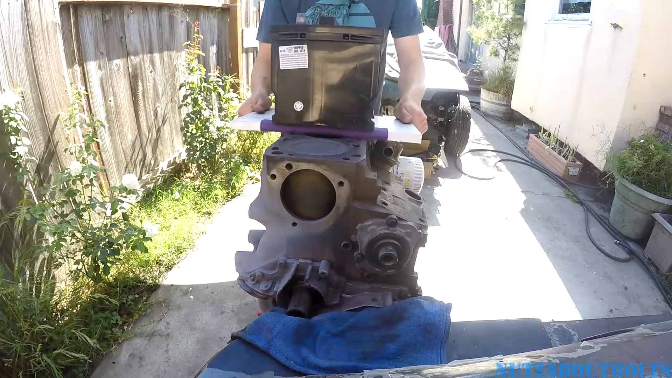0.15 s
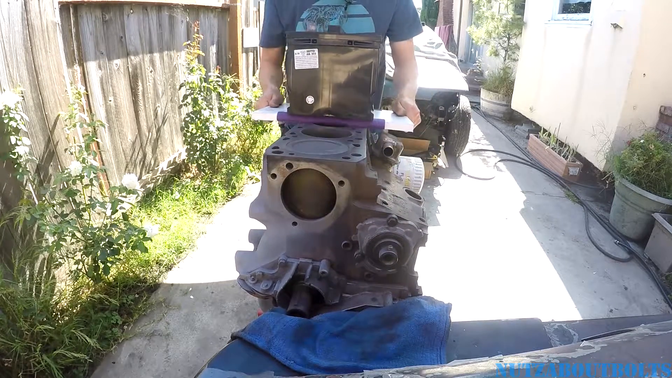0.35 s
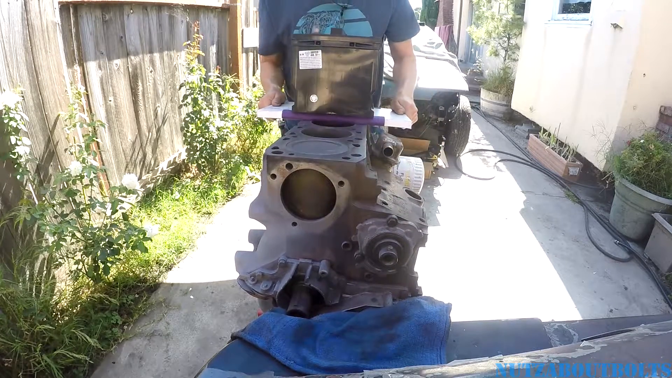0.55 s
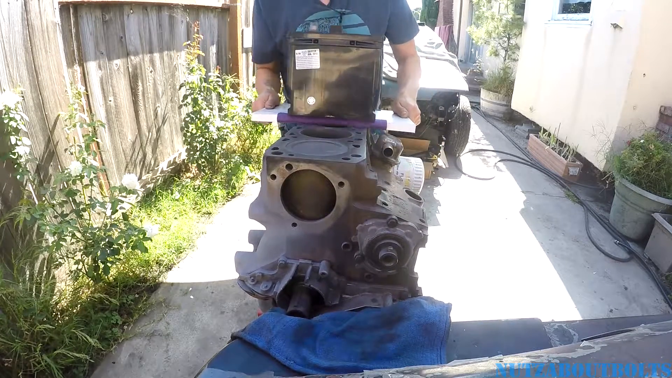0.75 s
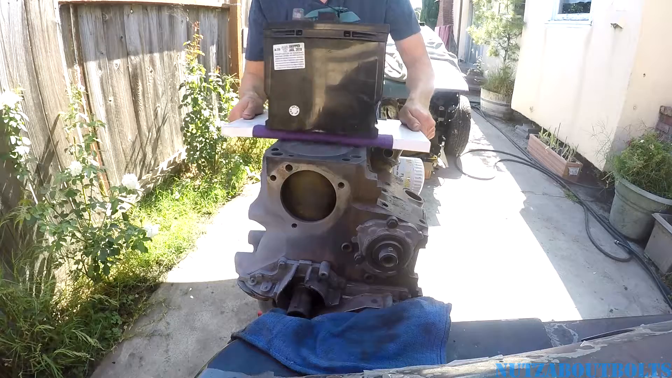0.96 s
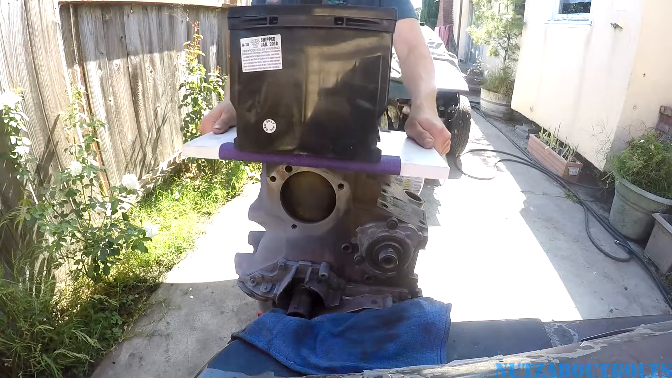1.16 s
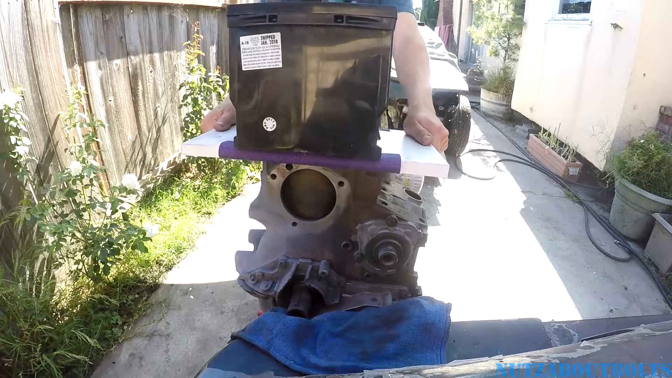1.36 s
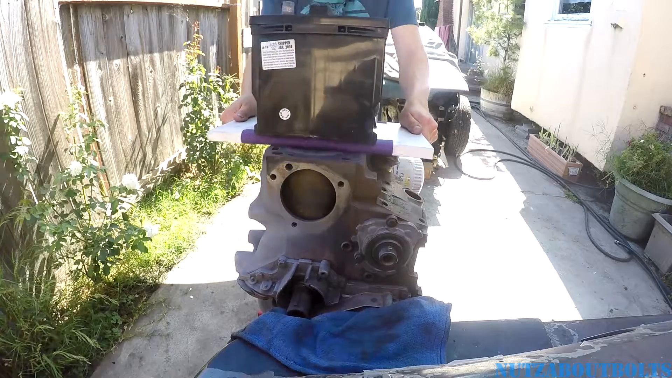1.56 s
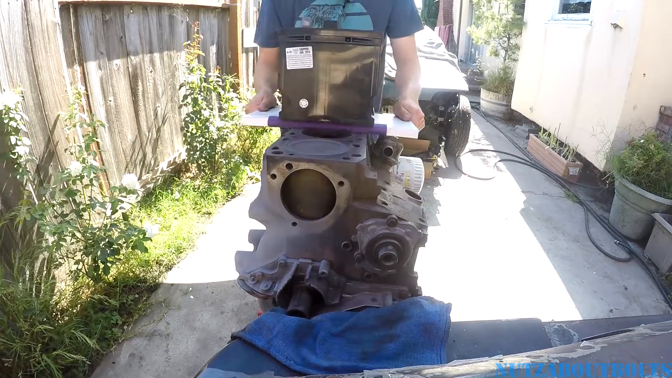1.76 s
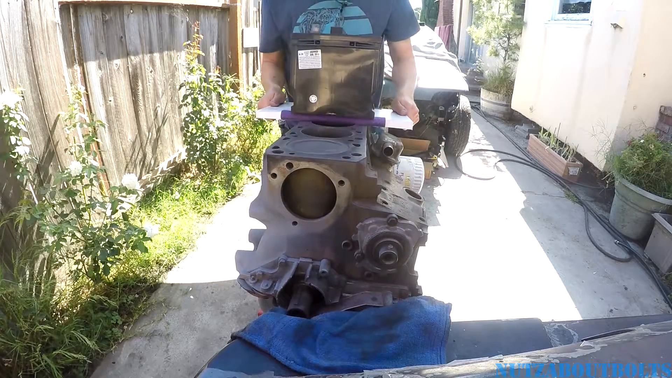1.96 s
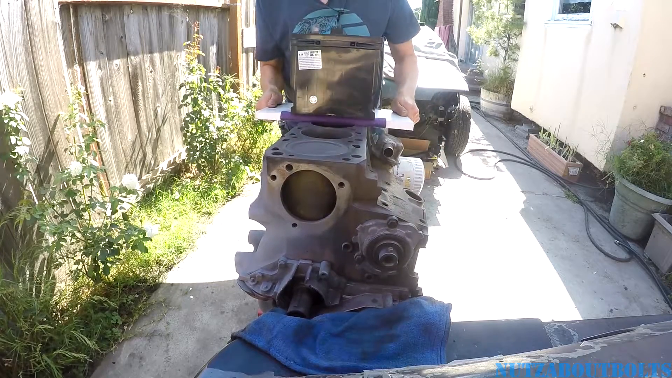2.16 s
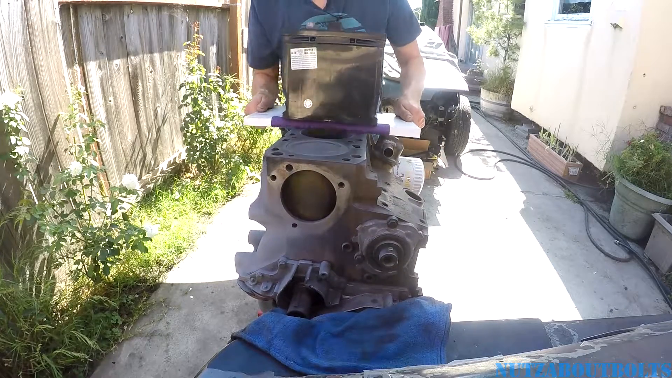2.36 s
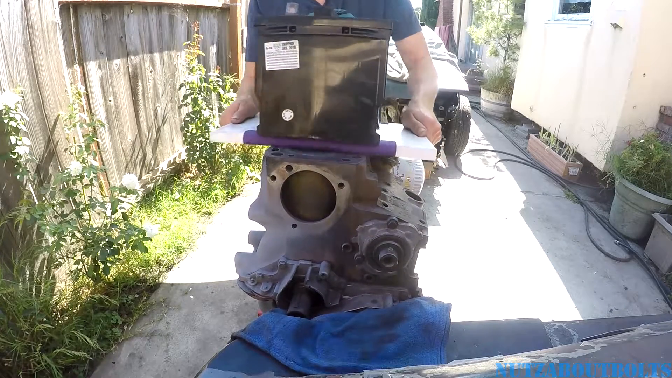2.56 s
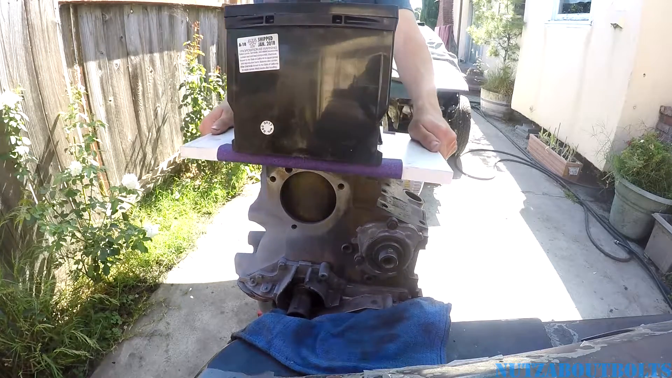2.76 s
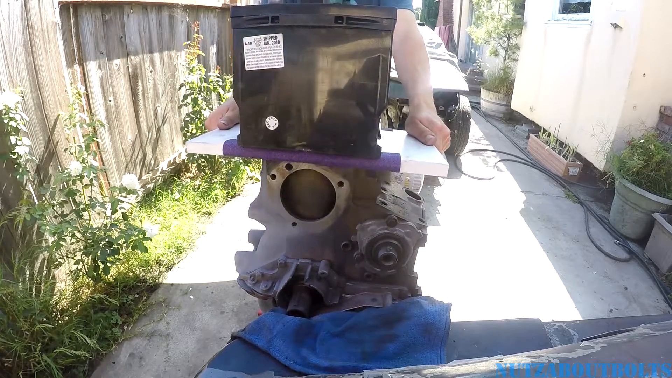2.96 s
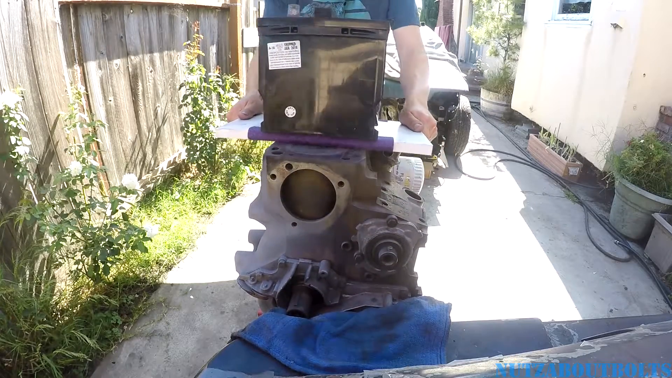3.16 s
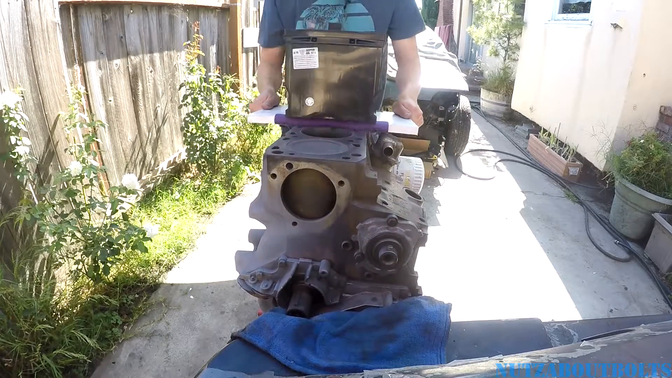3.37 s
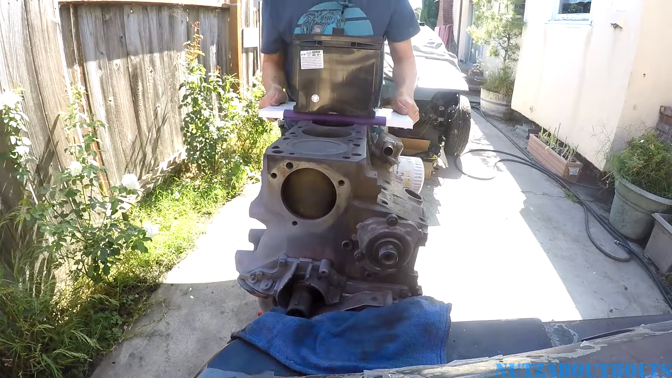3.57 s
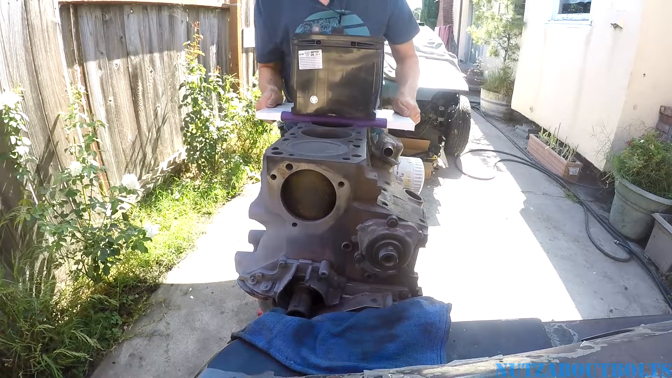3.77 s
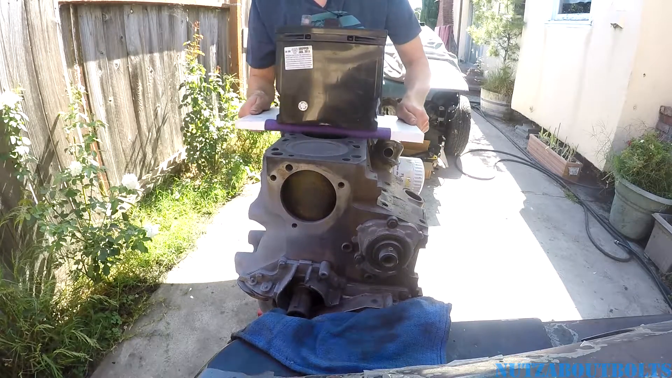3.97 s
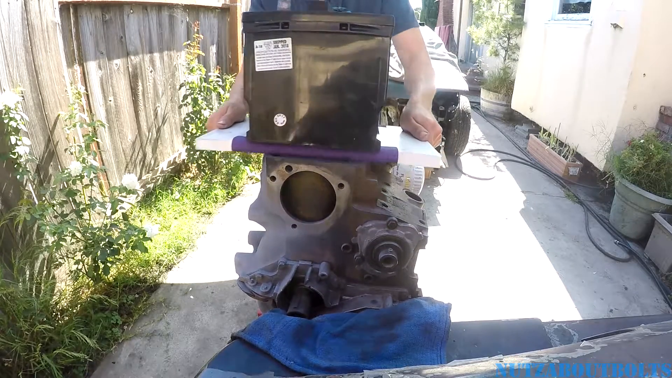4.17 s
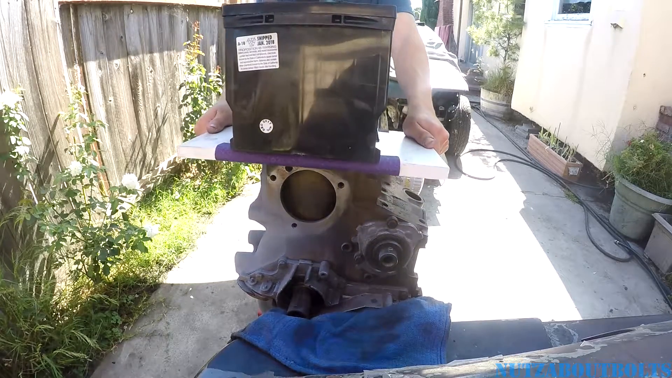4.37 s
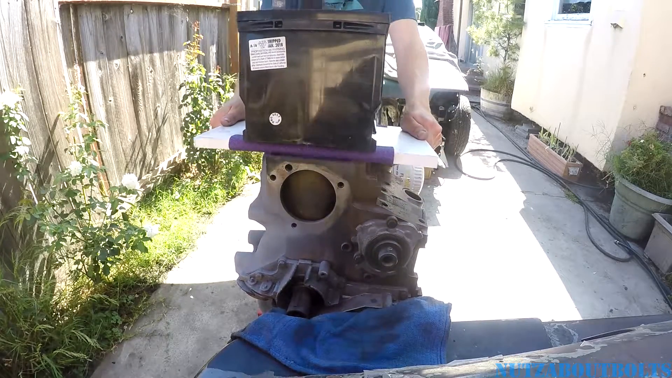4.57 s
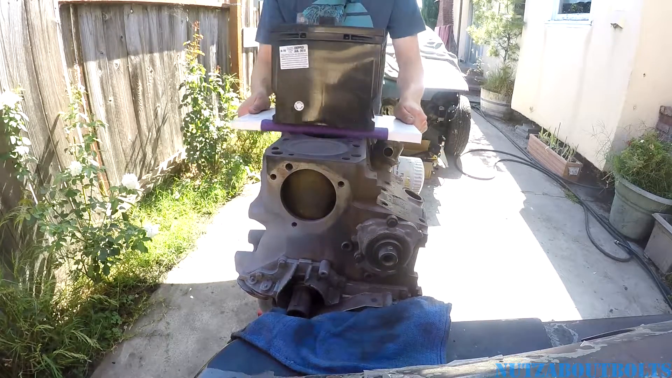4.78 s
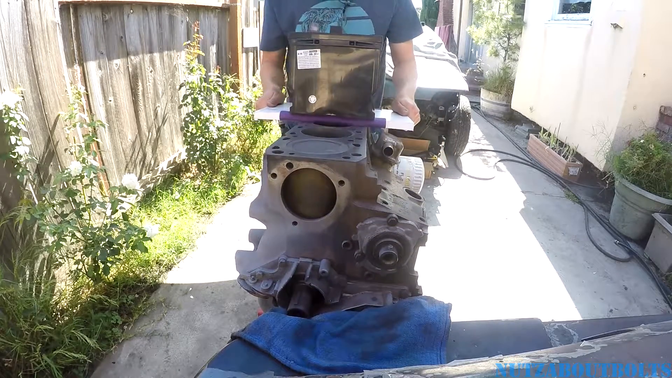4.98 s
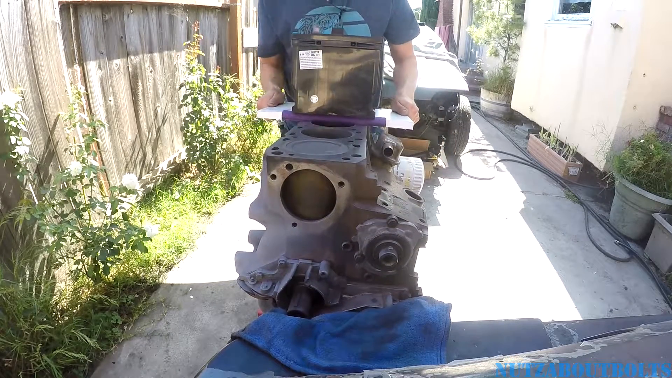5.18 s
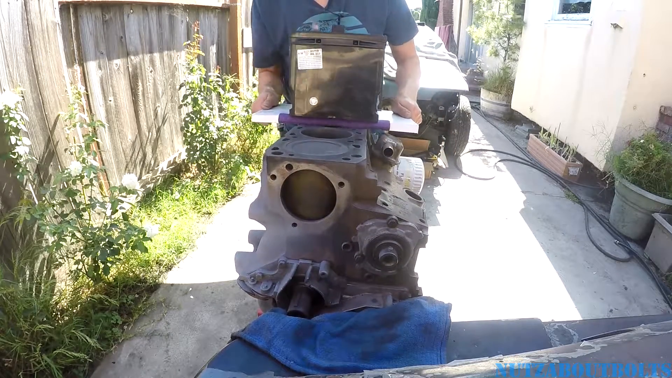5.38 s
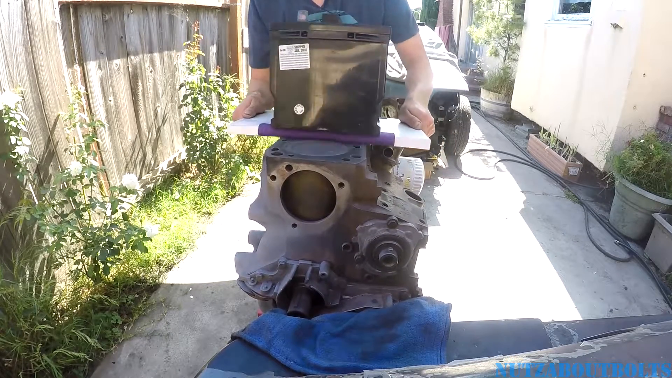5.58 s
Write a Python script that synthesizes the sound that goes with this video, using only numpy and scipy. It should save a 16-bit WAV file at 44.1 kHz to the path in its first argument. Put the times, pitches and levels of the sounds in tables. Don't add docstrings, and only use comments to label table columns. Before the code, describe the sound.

Close, dry, gritty scraping swings back and forth on metal, each stroke lasting a bit over half a second. Pushes and pulls differ in colour; the paper snags and slips at edges while the board thumps hollowly. An early hard knock sets off a short buzzing rattle. Crisp ticks mark the turns, the sharpest near the end, over low distant traffic, all centred and slightly muffled on one microphone.

```python
import sys
import numpy as np
from scipy import signal
from scipy.fft import rfft, irfft, next_fast_len
from scipy.io import wavfile
from scipy.ndimage import uniform_filter1d, minimum_filter1d, map_coordinates

SR = 44100
rng = np.random.default_rng(int(sys.argv[2]) if len(sys.argv) > 2 else 0)


def gain_from_decibels(decibels):
    exponent = np.asarray(decibels, float) / 20
    return 10 ** exponent


def unload_audio(sound):
    columns = np.transpose(np.atleast_2d(sound))
    steps = np.round(np.clip(columns, -1, 1) * 32767)
    wavfile.write(sys.argv[1], SR, steps.astype(np.int16))


N = 248283


def unit(x):
    return x / np.sqrt(np.mean(x ** 2) + 1e-20)


def wobble(rate_hz):
    knots = rng.standard_normal(int(N * 400 / SR) + 4)
    return map_coordinates(knots, [np.arange(N) * min(rate_hz, 400) / SR])


def coloured(x, spectrum):
    m = next_fast_len(len(x) + 8192)
    hz, db = np.transpose(spectrum)
    log_hz = np.log(np.fft.rfftfreq(m, 1 / SR) + 1)
    gain = gain_from_decibels(np.interp(log_hz, np.log(hz + 1), db, left=-120, right=-120))
    return unit(irfft(rfft(x, m) * gain, m)[:len(x)])


def patchy(x, depth_db):
    z = signal.stft(x, nperseg=512)[2]
    field = uniform_filter1d(rng.standard_normal(z.shape), size=7, axis=0)
    field = uniform_filter1d(field, size=8, axis=1)
    return signal.istft(z * gain_from_decibels(depth_db * unit(field)), nperseg=512)[1][:N]


# (frequency [Hz], density [dB per Hz])
RASP_SPECTRA = [
    [(590, -35), (1000, -15), (1260, -10), (2160, 0), (2920, -3.5), (3520, -14), (4000, -14.5),
     (5200, -14.5), (8800, -120)],
    [(590, -32), (1000, -18.5), (1520, -6.5), (1610, -5.5), (2160, 0), (2670, -1), (3380, -13.5),
     (4000, -15.5), (5200, -28), (8800, -120)],
]
# (frequency [Hz], density [dB per Hz])
HISS_SPECTRA = [
    [(3530, -33), (6000, -7), (8250, 0), (9410, -2.5), (10600, -8.5), (13300, -30), (15600, -40)],
    [(3530, -49), (6000, -12), (8030, -1), (9040, -1.5), (10900, -10), (13600, -35.5), (15600, -45)],
]
# (frequency [Hz], density [dB per Hz])
SCRATCH_SPECTRUM = [(2900, -2), (3600, -12), (4500, -3), (5600, -2), (6500, -3.5), (7500, -1)]
# (frequency [Hz], density [dB per Hz])
DRAG_SPECTRUM = [(350, -15.5), (600, -3.5), (800, 3), (1200, -1), (1700, -4)]


def sanding():
    rasp_db, hiss_db, scratch_db, drag_db = stroke_levels()
    rim_db, flutter = rims(), wobble(45)
    bite = np.clip((rasp_db + rim_db + 17) / 15, 0, 1)

    rasp_grit = grit(spread_db=2.5, clump_db=0.4 + 1.0 * bite, clump_rate_hz=260)
    hiss_grit = grit(spread_db=1.8, clump_db=1.2, clump_rate_hz=350)
    scratch_grit = grit(spread_db=2, clump_db=1.2, clump_rate_hz=300)
    drag_grit = grit(spread_db=2, clump_db=1.2, clump_rate_hz=120)
    rasp = both_ways(patchy(rasp_grit, 1.5), RASP_SPECTRA)
    hiss = both_ways(patchy(hiss_grit, 1.6), HISS_SPECTRA)
    scratch = coloured(patchy(scratch_grit, 1.6), SCRATCH_SPECTRUM)
    drag = coloured(patchy(drag_grit, 1.1), DRAG_SPECTRUM)

    dull = np.clip((-28 - rasp_db - hiss_db) / 16, 0, 0.7)
    top = signal.butter(2, 10500, 'high', fs=SR, output='sos')
    hiss = hiss - dull * signal.sosfiltfilt(top, hiss)

    treble_db = rasp_db + 0.35 * rim_db + 0.45 * flutter
    return (gain_from_decibels(rasp_db + rim_db - 2.6 * bite + 0.13 * flutter) * rasp
            + gain_from_decibels(treble_db + hiss_db) * hiss
            + gain_from_decibels(treble_db + scratch_db) * scratch
            + gain_from_decibels(rasp_db + drag_db + 1.55 + 0.25 * rim_db + 0.19 * flutter) * drag)


def grit(spread_db, clump_db, clump_rate_hz):
    size_db = spread_db * np.minimum(rng.exponential(size=N), 6) + clump_db * wobble(clump_rate_hz)
    return gain_from_decibels(size_db) * rng.standard_normal(N)


# (start [s], near rim [s], far rim [s], stop [s], pressure [dB])
STROKES_S = [
    (-.2, .2, 0.3, 0.56, -2),
    (.613, .931, 1.04, 1.25, 0),
    (1.342, 1.745, 1.848, 2.045, 0.5),
    (2.13, 2.477, 2.56, 2.787, 1.5),
    (2.895, 3.3, 3.42, 3.609, 1),
    (3.685, 4.016, 4.15, 4.33, 0),
    (4.422, 4.83, 4.92, 5.122, 0),
    (5.232, 5.573, 5.4, 5.9, 0),
]
PUSH_DB = [
    (-28.5, -28, -23, -24.5, -25.5, -26.5, -35),
    (-36, -28.5, -26.5, -24, -27, -30.5, -39.5),
    (-42, -29, -32.5, -27.5, -24, -33.5, -43),
]
PULL_DB = [
    (-35.5, -24, -17.5, -27, -26, -26, -28),
    (-41.5, -26.5, -21.5, -27.5, -22, -25.5, -29),
    (-42, -28.5, -30.5, -31, -33, -33, -38),
]
# (rasp, hiss, scratch, drag) [dB per dB of speed]
SPEED_GROWTH = (1.37, 1.44, 1.55, 0.84)


def stroke_levels():
    load_s, slip_s, clear_s = (0.071, 0.092), (0.036, 0.0054), (0.043, 0.05)
    attack_s, release_s = (0.029, 0.025), (0.039, 0.021)
    creep, creep_s = (0.02, 0.12), (0.014, 0.027)
    drag_ends_db = ((-43.5, -39.5), (-35, -39))
    drag_follows = 0.155

    t, power = np.arange(N) / SR, np.full((4, N), 1e-14)
    for k, (start, near, far, stop, pressure_db) in enumerate(STROKES_S):
        way = k % 2
        marks = [start, near - load_s[way], near, near + slip_s[way], far, far + clear_s[way], stop]
        deck_db = [pressure_db + np.interp(t, marks, row) for row in (PUSH_DB, PULL_DB)[way]]
        drag_db = np.interp(t, [start, stop], drag_ends_db[way])
        deck_db.append(drag_db + drag_follows * (deck_db[0] + 29))
        rising = (1 - np.exp(-np.maximum(t - start, 0) / attack_s[way])) ** 2
        rising = rising + creep[way] * np.exp(-np.abs(t - start) / creep_s[way])
        speed = rising * (1 - np.exp(-np.maximum(stop - t, 0) / release_s[way]))
        power += gain_from_decibels(2 * np.array(deck_db)) * speed ** (2 * np.c_[list(SPEED_GROWTH)])
    smooth = np.abs(uniform_filter1d(power, size=130, axis=1))
    rasp_db, *rest = 10 * np.log10(smooth + 1e-14)
    return rasp_db, *(rest - rasp_db)


# (let-go [s], rasp boost [dB], build-up [s])
RIM_SNAGS = [(.19, 5, 0.0049), (0.933, 5.5, 0.013), (.95, -7, 0.0062), (1.75, 10, 0.004), (1.845, 4.5, .01),
             (1.96, 2.5, 0.012), (2.477, 9, 0.025), (2.576, 8, 0.0061), (3.3, 0, 0.0096),
             (3.345, 3.5, 0.026), (3.407, 6, 0.0056), (4.006, 4, 0.0071), (4.165, 7, 0.0079),
             (4.765, 4, 0.0063), (4.835, 6, 0.0068), (4.93, 3, .02), (5.577, -1.5, 0.015)]


def rims():
    t = np.arange(N) / SR
    boost_db = sum(db * np.exp(np.minimum(t - s, 0) / rise_s) * (t < s) for s, db, rise_s in RIM_SNAGS)
    return uniform_filter1d(boost_db, size=130)


TURNS_S = [.59, 1.3, 2.08, 2.85, 3.64, 4.39, 5.18]


def both_ways(x, spectra):
    pulling = np.searchsorted(TURNS_S, np.arange(N) / SR) % 2
    return np.where(pulling, coloured(x, spectra[1]), coloured(x, spectra[0]))


# (time [s], peak [dB], upper modes [dB])
KNOCK_EVENTS = [(0.035, -22.5, 1), (0.151, -26.5, -8), (1.005, -11, 1), (1.331, -32, -13), (1.588, -18, 2),
                (1.771, -27, -6), (2.595, -12.5, -0.5), (2.877, -32, 0), (3.135, -18, 0),
                (3.311, -20.5, -6), (4.147, -12, -0.5), (4.672, -20, 0), (4.849, -22.5, -5)]
# (frequency [Hz], level [dB])
BOARD_MODES = [(310, -3), (375, 3), (490, -0.5), (595, -1), (640, -29), (900, -6.5)]


def knocks():
    out, t = np.zeros(N + SR), np.arange(SR // 10) / SR
    blows = [(*row, 0.009) for row in KNOCK_EVENTS]
    for k, (late, hard) in enumerate(rng.standard_normal((9, 2))):
        bounce_s = 1.0215 + 0.012 * k + 0.00093 * late
        bounce_db = -16 - 0.1659 * k * k + 0.5 * hard
        blows.append((bounce_s, bounce_db, -1, 0.0067))
    for s, db, upper_db, ring_s in blows:
        ring = sum(gain_from_decibels(level_db + (hz > 450) * upper_db) * np.sin(2 * np.pi * hz * t)
                   for hz, level_db in BOARD_MODES)
        envelope = (1 - np.exp(-t / 0.0011)) * np.exp(-(t / ring_s) ** 2)
        out[round((s + 0.0012) * SR):][:len(t)] -= gain_from_decibels(db - 5) * ring * envelope
    return signal.sosfilt(signal.butter(2, 230, 'high', fs=SR, output='sos'), out[:N])


def panel():
    t = np.arange(N) / SR - 1.006
    swell = np.interp(t, [0, 0.005, 0.06, 0.085, 0.11], [0, 1.0, 1, 0.66, 0.018])
    return gain_from_decibels(-29.0) * swell * np.sin(2 * np.pi * 588 * t + 0.5 * wobble(32))


# (time [s], rms [dB], t60 [s], top end [dB])
TICK_EVENTS = [(.542, -42, .01, 0), (.563, -52, 0.011, 0), (1.281, -38, 0.011, 4), (1.2837, -46, 0.014, 3),
               (2.128, -44, .01, -6), (2.1357, -33, 0.011, -8), (2.802, -40.5, 0.018, -6),
               (2.8222, -28.5, 0.016, -1), (2.862, -55, .015, 0), (2.904, -38, 0.017, -6),
               (3.58, -33, .015, -3.5), (3.593, -42, .015, -6), (3.67, -47, .02, -7), (4.37, -38, 0.02, 7),
               (5.2535, -41, .015, -8), (5.262, -44, .012, -8), (5.3345, -18, 0.0087, 4)]
# (frequency [Hz], density [dB per Hz])
TICK_BODY = [(1500, -16), (3500, -3), (5000, -16), (6500, -1), (9000, 7), (11500, -11), (13000, -28),
             (15700, -45)]
# (frequency [Hz], density [dB per Hz])
TICK_DULL = [(1200, -12), (2500, 0), (5500, -2), (7500, -20)]
# (frequency [Hz], density [dB per Hz])
TICK_SHARP = [(9000, -30), (12000, -4), (15700, -13)]


def ticks():
    body, low, top = np.zeros((3, N + SR))
    t = np.arange(SR // 20) / SR
    for s, db, t60_s, top_db in TICK_EVENTS:
        decay = gain_from_decibels(db - 60 * t / t60_s) * (1 - np.exp(-t / 0.00051))
        here = slice(round(s * SR), round(s * SR) + len(t))
        body[here] += decay
        low[here] += gain_from_decibels(-top_db - 12) * decay
        top[here] += gain_from_decibels(top_db - 22) * decay
    return (body[:N] * coloured(rng.standard_normal(N), TICK_BODY)
            + low[:N] * coloured(rng.standard_normal(N), TICK_DULL)
            + top[:N] * coloured(rng.standard_normal(N), TICK_SHARP))


def fences(x):
    t = np.arange(SR // 4) / SR
    tail = rng.standard_normal(len(t)) * gain_from_decibels(-60 * t / 0.18) * (t > 0.006)
    return signal.fftconvolve(x, tail / np.linalg.norm(tail))[:N]


# (frequency [Hz], density [dB per Hz])
YARD_SPECTRUM = [(14, -36), (30, -10), (55, 0), (100, -1), (190, -2.5), (360, -4), (560, -6), (900, -10.5),
                 (1500, -13.5), (2800, -20), (3400, -35), (9000, -37), (12000, -59), (15700, -51)]
# (time [s], level [dB])
YARD_LEVEL = [(0, -44), (1.3, -40.5), (3.2, -39), (5.63, -41.5)]


def yard():
    level_db = np.interp(np.arange(N) / SR, *np.transpose(YARD_LEVEL))
    return gain_from_decibels(level_db) * coloured(patchy(rng.standard_normal(N), 1.1), YARD_SPECTRUM)


def scene():
    work = sanding() + knocks() + panel() + ticks()
    mono = work + gain_from_decibels(-15.5) * fences(work) + yard()
    return np.array([mono, mono])


def top_cut(x):
    return signal.sosfilt(signal.butter(12, 15700, fs=SR, output="sos"), x)


def record(dry):
    need = np.minimum(0.9 / (np.abs(dry[0]) + 1e-9), 1)
    gain = uniform_filter1d(minimum_filter1d(need, size=201), size=201)
    return top_cut(dry * gain)


dry = scene()
out = record(dry)
unload_audio(out)
```